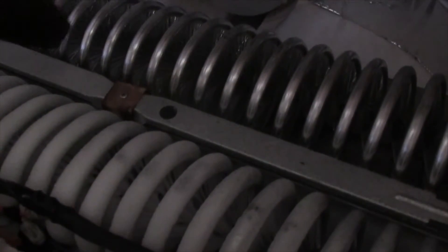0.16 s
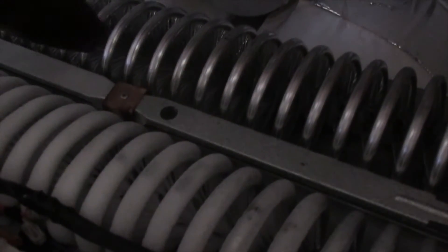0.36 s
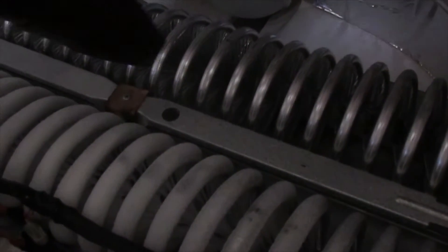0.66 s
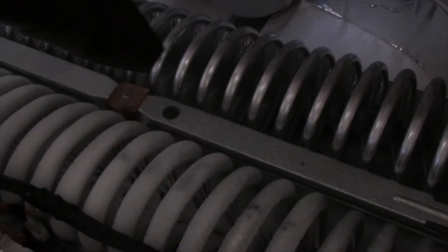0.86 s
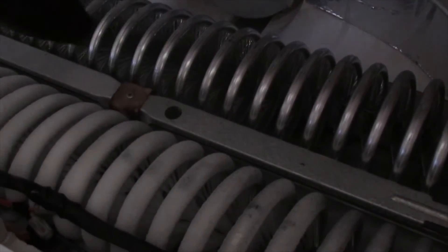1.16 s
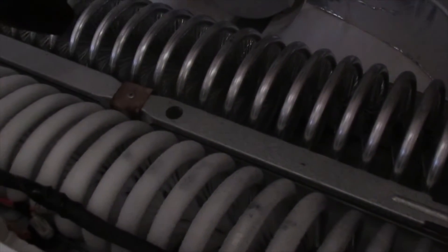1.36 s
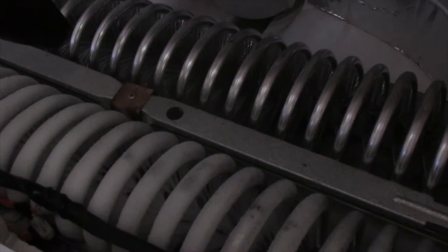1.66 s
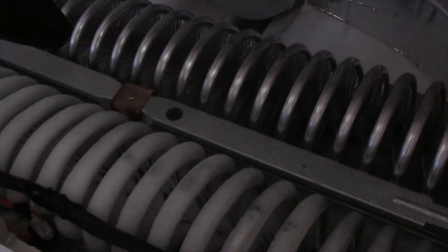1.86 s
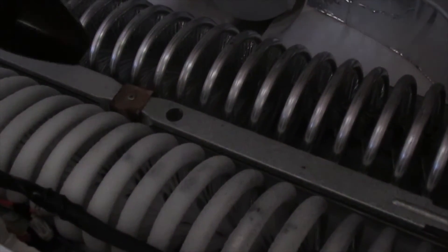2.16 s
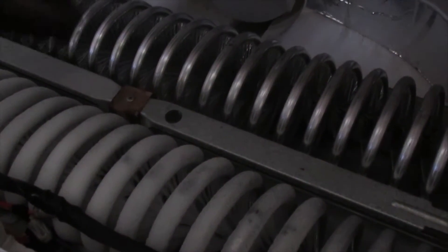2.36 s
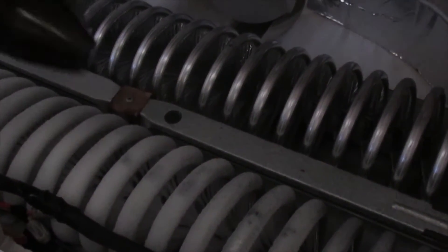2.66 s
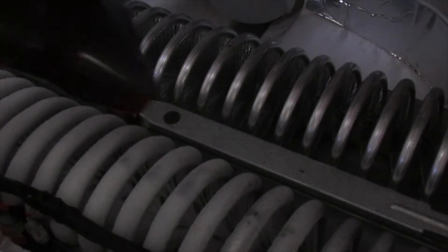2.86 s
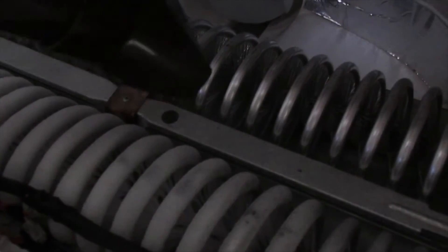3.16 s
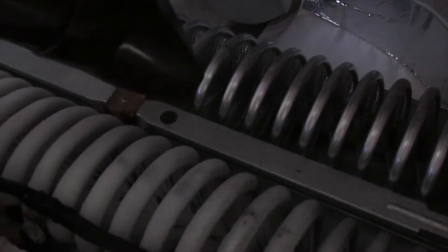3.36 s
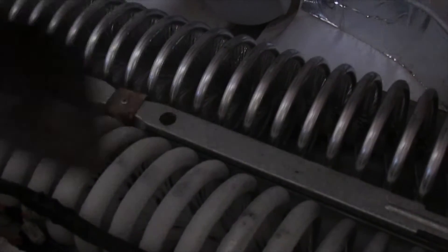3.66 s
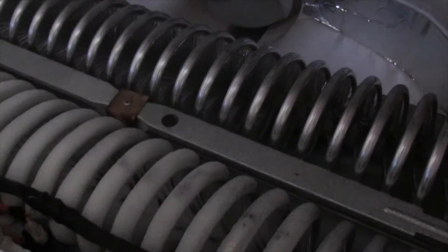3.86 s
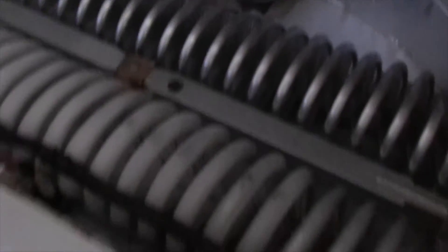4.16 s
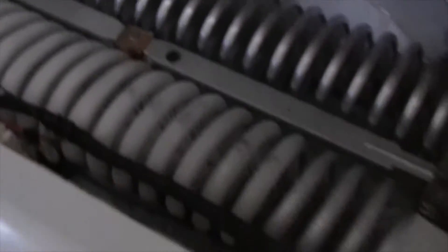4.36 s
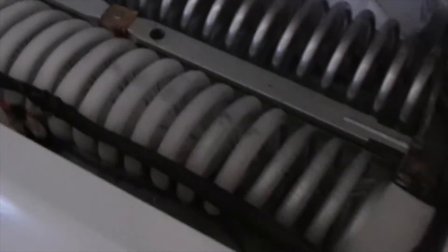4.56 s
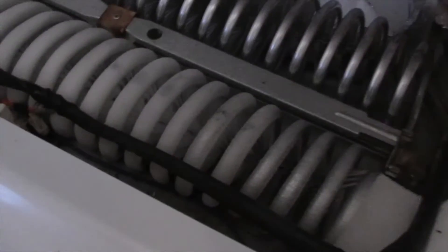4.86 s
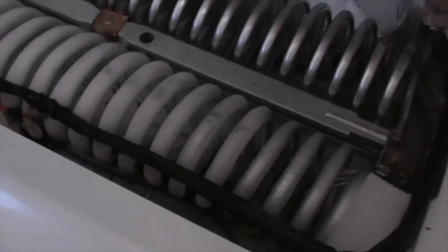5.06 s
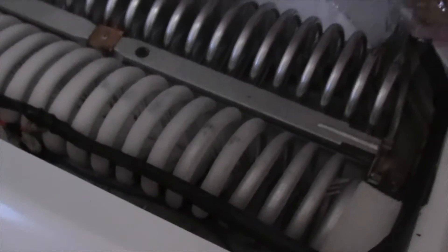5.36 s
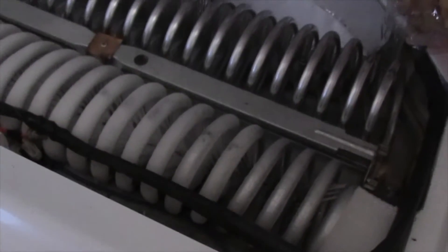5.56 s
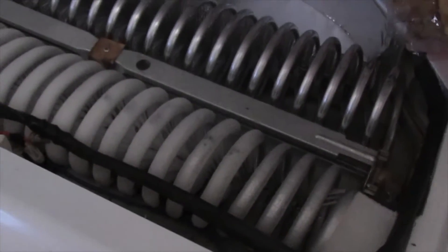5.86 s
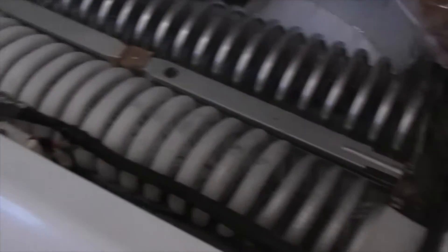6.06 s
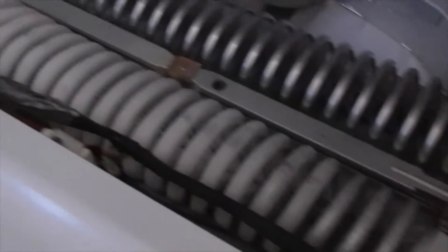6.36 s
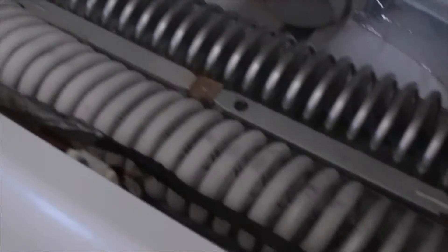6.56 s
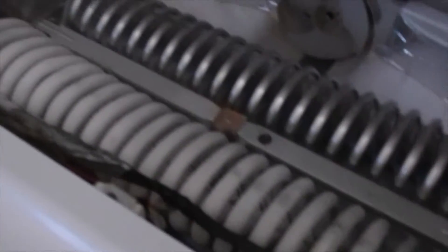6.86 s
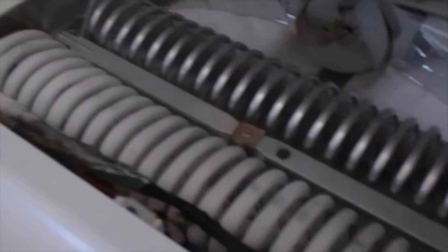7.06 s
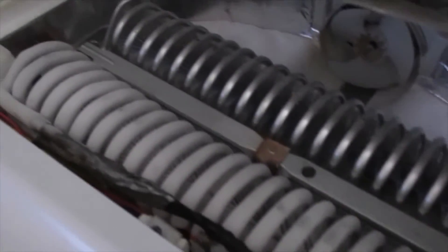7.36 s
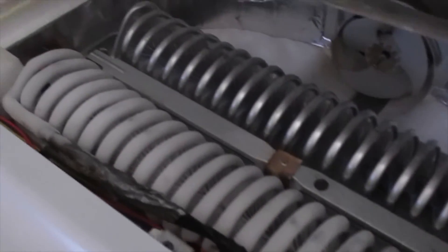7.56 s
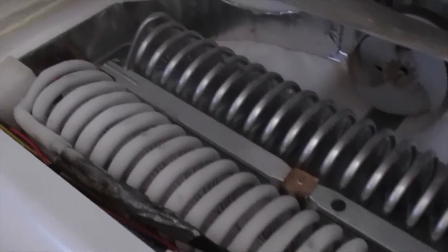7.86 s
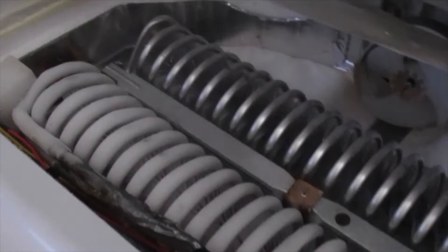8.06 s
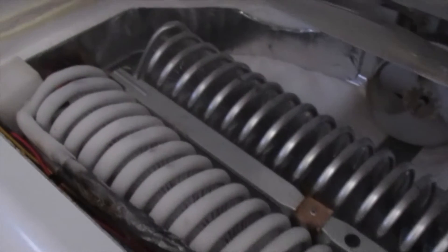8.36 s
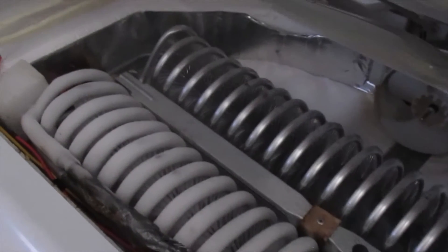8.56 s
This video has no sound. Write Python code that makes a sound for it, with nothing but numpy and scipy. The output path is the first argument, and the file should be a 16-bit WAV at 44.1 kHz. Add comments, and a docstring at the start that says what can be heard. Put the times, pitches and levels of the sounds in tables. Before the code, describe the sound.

A hair dryer blows close to the microphones onto refrigerator coils, a steady fluttering rush with a faint motor whine. A very loud switch snap stops it; the fan whirrs down while hiss creeps back. Rustling and dull thuds follow, then a cluster of hard metallic clanks and scrapes, and finally a few soft knocks in a quiet indoor compartment.

```python
"""Hair dryer in a refrigerator's coil compartment

A dryer blows on the coils near two hissy microphones: turbulence is shaped noise, the motor a set of harmonics.
Its switch snaps off so sharply that a limiter ducks; the fan coasts down whirring while the hiss creeps back.
The dryer is drawn away with a rustle and dull thuds, which are bursts of filtered noise.
Then decaying modes of metal ring under clanks and scrapes, and a few soft knocks follow."""
import sys
import numpy as np
from scipy import signal
from scipy.fft import irfft
from scipy.io import wavfile
from scipy.ndimage import uniform_filter1d

SR = 44100
rng = np.random.default_rng(int(sys.argv[2]) if len(sys.argv) > 2 else 0)


def store_pcm(level_fs):
    """Save levels as 16-bit WAV."""
    pcm = np.round(np.clip(level_fs, -1, 1) * 32767).astype(np.int16)
    wavfile.write(sys.argv[1], SR, np.atleast_2d(pcm).T)


N = 384993
TIME = np.arange(N) / SR
OFF_S = 3.1845  # the switch snaps

# Resonances and hollows of the barrel and compartment. Each row: centre in Hz, width in Hz, lift in dB.
HOLLOWS = [(272, 56, 7.5), (297, 29, 2), (332, 24, -3.5), (397, 45, 4), (543, 42, 4), (618, 51, -4),
           (687, 47, 8.5), (758, 50, 8.5), (837, 80, 5.5), (915, 50, -1), (1314, 84, -3), (1415, 42, 6.5),
           (1510, 70, 3), (1656, 55, 6), (1850, 70, 4), (2086, 65, 3), (2172, 45, 8), (2760, 37, 5),
           (3300, 220, 1.5), (4370, 170, 3.5)]
# What the cabinet gives back when it is hit. Each row: frequency in Hz, relative density in dB per Hz.
CABINET = [(40, -27), (115, -6.5), (175, -20), (260, -0.5), (390, 0.5), (520, -5), (640, -1.5), (800, 4),
           (980, -5.5), (1450, -12), (2300, -30), (6000, -55)]
# Hard clanks against the metal. Each row: start in seconds, thud in dB, crunch in dB, ring in dB,
# crunch t60 in seconds, strength of the jangle as a factor, treble tilt in dB per octave.
CLANKS = [(5.621, -20.5, -19.5, -40, 0.24, 0.2, -1), (5.644, -23, -40, -35, 0.1, 0.5, 0),
          (5.676, -25.5, -15.5, -34, 0.23, 1.6, -2.5), (5.723, -31, -9, -37, 0.091, 0.8, 1.5),
          (5.739, -27, -13.5, -42, 0.2, 1.0, -1.5), (6.022, -24.5, -12.5, -37, 0.22, 0.31, 0),
          (6.088, -31, -25, -41.5, 0.17, 0.6, -6), (6.110, -34.5, -36, -46, 0.1, 0.5, 0)]


def gain_of(db):
    """Decibel law: 20 dB is a factor of ten in amplitude."""
    return 10 ** (np.asarray(db) / 20)


def evened(x):
    """Normalisation to unit root mean square."""
    return x / np.sqrt(np.mean(x ** 2) + 1e-20)


def read(points, hz):
    """Spectral interpolation along a logarithmic frequency axis."""
    f, value = np.transpose(points)
    return np.interp(np.log(hz + 1), np.log(f + 1), value)


def lift_db(resonances, hz):
    """Resonance: each lifts a bell of frequencies, to half its dB at the edges of its width."""
    return sum(lift / (1 + (2 * (hz - f) / width) ** 2) for f, width, lift in resonances)


def add(mix, s, sound):
    """Superposition: a stereo sound joins the mix at s seconds."""
    part = mix[:, round(s * SR):][:, :sound.shape[1]]
    part += sound[:, :part.shape[1]]


def drift(t, rate):
    """Random wandering of unit rms: sines up to rate Hz, the slower the stronger."""
    rates = np.geomspace(rate / 20, rate, 24)
    return evened(sum(np.sin(2 * np.pi * (f * t + rng.random())) / np.sqrt(f) for f in rates))


def pair(shape, same):
    """Coherence: complex noise for two microphones, alike to the degree given by same."""
    a, b = rng.standard_normal((2, *shape)) + 1j * rng.standard_normal((2, *shape))
    same = np.clip(same, -1, 1)
    return np.array([a, same * a + np.sqrt(1 - same ** 2) * b])


def sides(points, hz):
    """Interaural level difference: half the balance goes to each side with opposite sign."""
    return gain_of(np.outer([.5, -.5], read(points, hz)))


def ripple(hz, spacing_hz, full_above_hz=3200):
    """Comb-like interference: fine fixed peaks and dips at each microphone, smaller towards the bass."""
    grid = np.arange(0, SR / 2, spacing_hz)
    heights = rng.standard_normal((2, len(grid)))
    peaks = evened(np.array([np.interp(hz, grid, ear) for ear in heights]))
    return peaks * np.sqrt(np.minimum(hz / full_above_hz, 1))


def burst(colour_db, t60, rise_s):
    """Transient: a second of noise, coloured by one dB value per Hz, swells and decays exponentially."""
    # Each row: frequency in Hz, left-right likeness from -1 to 1.
    knock_same = [(100, 0.9), (400, 0.95), (800, 0.59), (1500, 0.53), (3500, 0.016), (15000, 0.034)]
    t, hz = np.arange(SR) / SR, np.arange(colour_db.shape[-1])
    spectrum = pair(hz.shape, read(knock_same, hz)) * gain_of(colour_db)
    noise = evened(irfft(spectrum, SR))
    return noise * (1 - np.exp(-t / rise_s)) * gain_of(-60 * t / t60)


def fan_speed(t, coast_s=0.6):
    """Exponential coasting: share of full speed, steady until the power is cut."""
    return np.exp(-np.maximum(t - OFF_S, 0) / coast_s)


def air(level_db=-17.5, gap_lift_db=10, gap_width_hz=115, eddy_db=0.9, buffet_db=0.65, cut_db=1.0,
        roar_fall_db=38, treble_fall_db=25, ripple_db=2.5):
    """Turbulence: noise coloured by the hollows it blows through fades and dulls as the fan slows."""
    # The moving nozzle. Each row: time in seconds, jet hiss in dB (only its change counts),
    # pitch in Hz of the hollow between nozzle and coils.
    nozzle = [(0.0, -28.5, 1106), (0.82, -27, 1093), (1.17, -28.5, 1120), (2.26, -27, 1125),
              (2.62, -29, 1090), (2.94, -26, 1013), (3.15, -28, 955)]
    # How far each pitch follows the jet's hiss. Each row: frequency in Hz, share in dB per dB.
    jet_share = [(1200, 0), (2600, 1.0)]
    # Rushing air. Each row: frequency in Hz, relative density in dB per Hz.
    air_colour = [(20, -21), (45, -38), (80, -8.5), (200, -6), (480, -7), (900, -4), (1300, -7),
                  (2400, -13.5), (4800, -16.5), (6600, -13.5), (8500, -18), (10200, -24.5), (13000, -21),
                  (16000, -25.5)]
    # Each row: frequency in Hz, left-right likeness from -1 to 1.
    air_same = [(25, .3), (60, 0.83), (130, 0.98), (300, 0.97), (700, 0.68), (1400, 1), (3000, 0.046),
                (15000, 0.54)]
    # Each row: frequency in Hz, left minus right in dB.
    air_side = [(60, -2), (110, -1.5), (200, 1.5), (380, -4), (700, 4.5), (1290, -2), (2380, 0.5),
                (4400, 2), (8120, 4.5), (15000, 0.5)]
    # Each row: frequency in Hz, phase by which left leads in radians.
    air_lead = [(0, -2.5), (520, 0.5), (950, -0.63), (1890, 2.0), (2150, 1.1), (2500, 3.5), (2840, -2.5),
                (3700, 2.0), (3960, 3.5), (5000, 2), (7150, 8.5), (9040, 12), (13500, 15.5), (16300, 8)]

    t, hz = np.arange(N // 512 + 5) * 512 / SR, np.fft.rfftfreq(2048, 1 / SR)
    nozzle_s, hiss_db, hollow_hz = np.transpose(nozzle)
    jet_db = np.interp(t, nozzle_s, hiss_db)[:, None]
    gap_hz = np.interp(t, nozzle_s, hollow_hz)[:, None]
    field = read(air_colour, hz) + lift_db(HOLLOWS, hz)
    field = field + lift_db([(gap_hz, gap_width_hz, gap_lift_db)], hz)
    # the hand moves the nozzle
    field += (jet_db - hiss_db.mean()) * read(jet_share, hz)
    # eddies come and go in patches of time and frequency
    patches = uniform_filter1d(rng.standard_normal(field.shape), size=8, axis=0)
    field += eddy_db * evened(uniform_filter1d(patches, size=8, axis=1))
    # the jet buffets the coils, so everything above 700 Hz flutters together
    field += buffet_db * drift(t, 29.76)[:, None] * read([(500, 0), (700, 1.0)], hz)
    # the roar drops when the power is cut; slower air makes larger eddies, so the highs die first
    field -= cut_db * (t > OFF_S)[:, None]
    fall_db = roar_fall_db + treble_fall_db * np.log10(np.clip(hz, 150, 6000) / 800)  # per tenfold slowing
    field += np.log10(fan_speed(t))[:, None] * fall_db
    # each microphone has its own balance, reflections and phase
    lead = np.exp(1j * np.outer([.5, -.5], read(air_lead, hz)))
    ears = sides(air_side, hz) * gain_of(ripple_db * ripple(hz, 45)) * lead
    z = pair(field.shape, read(air_same, hz)) * gain_of(field) * ears[:, None]
    x = signal.istft(z.swapaxes(1, 2), nperseg=2048, noverlap=1536)[1][:, :N]
    return gain_of(level_db) * x / x[:, TIME < OFF_S].std()


def motor(shaft_hz=117.8, level_db=3, wobble=0.00093, coast_jitter=0.05, coast_jitter_hz=90, shimmer_db=4.0,
          fade_power=0.94, housing_hz=245, housing_width_hz=130, housing_db=8):
    """Harmonics of rotation: brush whine stops with the current, fan tones glide down through resonances."""
    # Each row: multiple of the shaft rate, relative level in dB.
    whine = [(2, -60), (4, -48), (12, -50), (14, -50), (37, -57), (46, -51), (49, -53), (55, -49),
             (56, -53), (57, -51), (58, -51), (59, -51), (60, -54), (68, -53), (70, -52)]
    t = TIME[::200]
    speed = fan_speed(t)
    # the glide grows uneven as the fan slows
    unsteady = wobble * drift(t, 12) + coast_jitter * (1 - speed) * drift(t, coast_jitter_hz)
    turns = np.cumsum(np.interp(TIME, t, shaft_hz * speed * (1 + unsteady))) / SR
    out = np.zeros((2, N))
    # the fan tones whirr as they pass the housing's resonance
    body = HOLLOWS + [(housing_hz, housing_width_hz, housing_db)]
    for order, db in whine:
        is_brush = order > 20
        drive = t < OFF_S if is_brush else speed ** fade_power
        resonance_db = lift_db(body, order * shaft_hz * speed)
        for ear in out:
            level = drive * gain_of(db + resonance_db + shimmer_db * drift(t, 10))
            lag = rng.random() / 20  # a small share of a turn: mainly high orders differ between the microphones
            ear += np.interp(TIME, t, level) * np.sin(2 * np.pi * order * (turns + lag))
    return gain_of(level_db) * out


def noise_floor(level_db=-32, hum_hz=65, hum_waver_db=2.0, ripple_db=2.5, rumble_below_hz=480,
                rumble_waver_db=2.0):
    """Stationary noise: microphone hiss, with room rumble that comes and goes and a wavering low hum."""
    # Quiet room and microphone hiss. Each row: frequency in Hz, relative density in dB per Hz.
    floor_colour = [(20, -3.5), (85, 1), (160, -5), (300, -5), (450, -7.5), (560, -12), (850, -11),
                    (1350, -10.5), (1900, -9.5), (2250, -8.5), (3000, -3.5), (4000, -3.5), (5800, 1),
                    (10000, -4.5), (13000, -3), (15800, -9)]
    # Resonances that colour the quiet room. Each row: centre in Hz, width in Hz, lift in dB.
    room = [(215, 78, 3.5), (342, 13, 5.5), (430, 38, 7.5), (970, 54, 3), (1336, 75, 4), (3160, 200, 4.5)]
    # Each row: frequency in Hz, left-right likeness from -1 to 1.
    floor_same = [(60, 0.46), (130, 0.024), (290, 0.72), (640, 0.66), (1410, 0.63), (3100, -0.0087),
                  (6820, 0.027), (15000, -0.01)]
    # Each row: frequency in Hz, left minus right in dB.
    floor_side = [(60, -1), (180, 3), (550, -1.5), (1650, 1), (4970, 0), (15000, 4)]
    # The low hum. Each row: time in seconds, level in dB.
    hum = [(5.1, -69), (5.5, -52), (6.3, -54), (6.6, -51), (7.3, -50), (7.8, -58), (8.5, -55)]

    hz, t = np.fft.rfftfreq(N, 1 / SR), TIME[::200]
    colour_db = read(floor_colour, hz) + lift_db(room, hz) + ripple_db * ripple(hz, 60)
    colour = gain_of(colour_db) * sides(floor_side, hz)
    noise = evened(irfft(pair(hz.shape, read(floor_same, hz)) * colour, N))
    low_pass = signal.butter(2, rumble_below_hz, fs=SR, output="sos")
    rumble = signal.sosfiltfilt(low_pass, noise)
    noise += rumble * (np.interp(TIME, t, gain_of(rumble_waver_db * drift(t, 3.3))) - 1)
    hum_db = np.interp(t, *np.transpose(hum)) + hum_waver_db * drift(t, 5)
    hum_tone = np.interp(TIME, t, gain_of(hum_db)) * np.sin(2 * np.pi * hum_hz * TIME)
    return gain_of(level_db) * noise + hum_tone


def switch(snap_db=15.5, snap_t60=0.027, echo_db=-17, echo_t60=0.21):
    """Impulse and reverberation: a very loud, bright snap and its short echo in the compartment."""
    # Each row: frequency in Hz, relative density in dB per Hz.
    snap_colour = [(40, -13), (300, 1), (2000, -2), (3100, -2), (4000, -6), (6000, 0), (12000, 5.5),
                   (16000, -0.5)]
    out, colour = np.zeros((2, N)), read(snap_colour, np.arange(SR // 2 + 1))
    snap = gain_of(snap_db) * burst(colour, snap_t60, 0.0013)
    echo = gain_of(echo_db) * burst(colour, echo_t60, .003)
    add(out, OFF_S, snap + echo)
    return out


def rustle(same=0.79, rough_db=1.5):
    """Friction noise: soft, uneven handling swells and fades as the dryer is drawn away."""
    # Each row: time in seconds, level in dB.
    swell = [(3.721, -56), (3.9, -33), (4.08, -36), (4.3, -38), (4.55, -47)]
    # Each row: frequency in Hz, relative density in dB per Hz.
    rustle_colour = [(40, -22), (120, -10), (400, 10), (560, 3), (800, 1), (1300, -4), (1700, -1),
                     (2200, -3), (3200, -4), (6000, -1.5), (15000, -12)]
    t, hz, out = np.arange(SR) / SR, np.arange(SR // 2 + 1), np.zeros((2, N))
    s, db = np.transpose(swell)
    noise = evened(irfft(pair(hz.shape, same) * gain_of(read(rustle_colour, hz)), SR))
    level_db = np.interp(s[0] + t, s, db) + rough_db * drift(t, 26.1)
    add(out, s[0], noise * gain_of(level_db))
    return out


def thuds(width_octaves=0.36):
    """Dull impact: each blow favours one pitch of the cabinet and loses the treble above its own limit."""
    # Each row: start in seconds, level in dB, pitch in Hz, lift at that pitch in dB, dull above in Hz,
    # rise in seconds, t60 in seconds.
    blows = [(3.955, -21, 420, 20, 1200, .02, 0.24), (3.975, -23, 216, 31, 620, 0.014, 0.21),
             (4.010, -24.5, 1073, 7, 3000, 0.035, 0.47), (4.028, -24, 114, 23, 320, 0.0074, .2),
             (5.629, -8.5, 830, 22, 2300, 0.0026, 0.068), (5.741, -25, 327, 8, 920, .002, 0.12),
             (5.970, -36, 780, 9, 2200, .006, 0.35), (6.028, -31, 115, 11, 320, .003, 0.43),
             (6.034, -20, 400, 15, 1000, 0.0023, 0.11), (6.490, -30, 437, 20, 600, 0.0074, 0.29),
             (6.752, -37.5, 370, 10, 2200, 0.0055, 0.21), (7.803, -30, 1010, 14, 1100, 0.0048, 0.26),
             (7.931, -27, 1640, 12, 4500, 0.0037, 0.37), (7.936, -35, 187, 21, 400, 0.0096, 0.39),
             (8.025, -34.5, 1300, 17, 1700, .006, 0.3), (8.040, -36, 131, 26, 390, 0.018, 0.44)]
    out, hz = np.zeros((2, N)), np.arange(SR // 2 + 1) + 1
    for s, db, pitch, lift, dull_hz, rise_s, t60 in blows:
        colour = read(CABINET, hz) + lift / (1 + (np.log2(hz / pitch) / width_octaves) ** 2)
        colour -= 20 * np.log10(1 + (hz / dull_hz) ** 6)
        add(out, s, gain_of(db) * burst(colour, t60, rise_s))
    return out


def mode(hz, t, apart_hz=4000):
    """Normal mode: a sine of unit rms, its phase between microphones differing by hz / apart_hz radians."""
    phase = 2 * np.pi * rng.random() + np.array([[.5], [-.5]]) * hz / apart_hz
    return np.sqrt(2) * np.sin(2 * np.pi * hz * t + phase)


def struck(t, t60, rise_s=0.0045):
    """Free decay: envelope of a mode t seconds after a blow."""
    since = np.maximum(t, 0)
    return (1 - np.exp(-since / rise_s)) * gain_of(-60 * since / t60)


def rubbed(t, length, t60, attack_s=0.0072, release_t60=0.14, after_ring_db=-7):
    """Forced, then free vibration: a mode holds under a stroke, drops quickly, then rings out."""
    since = np.maximum(t - length, 0)
    release_db = np.maximum(-60 * since / release_t60, after_ring_db - 60 * since / t60)
    return np.clip(t / attack_s, 0, 1) * gain_of(release_db)


def metal(fall_db_per_octave=400, rough_db=1.8, slips_per_s=110, chatter_db=2.2, chatter_per_s=120):
    """Modal excitation: blows and scrapes all feed the same modes; loose contact breaks up the ringing."""
    # Modes of the metal. Each row: frequency in Hz, relative level in dB when struck,
    # relative level in dB when rubbed, t60 in seconds.
    modes = [(356, -7, -34, 0.53), (794, 8, -9, 0.33), (1732, -4.5, -0.5, 0.43), (1804, -16, -19, 0.33),
             (2104, -15, -26, 0.43), (2873, -22, -9.5, 0.36), (5270, -22, -14, .25), (6067, -18, -20, .3)]
    # Touches and knocks that ring mainly one mode. Each row: start in seconds, level in dB, nearby pitch in Hz.
    pings = [(4.040, -41, 1733), (5.235, -39.5, 1733), (5.632, -17, 800), (6.050, -40, 2105),
             (6.055, -41, 1733), (6.160, -45, 802), (6.188, -41, 2116), (6.502, -33.5, 353),
             (6.768, -41, 355)]
    # Sliding strokes that keep the metal singing. Each row: start in seconds, length in seconds, level in dB.
    scrapes = [(5.617, 0.11, -27.5), (5.748, 0.072, -29)]

    t, out = TIME[::40], np.zeros((2, N))
    for hz, struck_db, rubbed_db, t60 in modes:
        slips = gain_of(rubbed_db + rough_db * drift(t, slips_per_s))
        chatter = evened(gain_of(chatter_db * drift(t, chatter_per_s)))
        feeds = []
        for s, db, near_hz in pings:
            ping_db = db - fall_db_per_octave * abs(np.log2(hz / near_hz))
            feeds.append(gain_of(ping_db) * chatter * struck(t - s, t60))
        for s, _, _, ring_db, *_ in CLANKS:
            feeds.append(gain_of(ring_db + struck_db) * chatter * struck(t - s, t60))
        for s, length, db in scrapes:
            feeds.append(gain_of(db) * slips * rubbed(t - s, length, t60))
        envelope = np.linalg.norm(feeds, axis=0)  # the energies add
        out += np.interp(TIME, t, envelope) * mode(hz, TIME)
    return out


def clanks(thud_t60=0.37, thud_rise_s=0.0031, crunch_rise_s=0.0065, ripple_db=2, grain_db=0.9):
    """Hard impact: the cabinet thuds, and the contact crunches and jangles differently at each spot."""
    # Hard contact. Each row: frequency in Hz, relative density in dB per Hz.
    crunch_colour = [(500, -48), (2400, -9.5), (4000, -3), (6000, -1), (9000, -1.5), (13000, -1),
                     (16000, -7.5)]
    # Resonances of the jangle. Each row: centre in Hz, width in Hz, lift in dB at a strength of 1.
    jangle_peaks = [(4300, 250, 3.4), (5300, 220, 8), (6080, 300, 8.5), (7700, 260, 1.6), (9300, 250, 6.4),
                    (10200, 330, 7), (11800, 350, 5), (13050, 260, 4), (14600, 300, 6)]
    out, hz = np.zeros((2, N)), np.arange(SR // 2 + 1)
    for s, thud_db, crunch_db, _, t60, jangle, tilt_db in CLANKS:
        crunch = read(crunch_colour, hz) + jangle * lift_db(jangle_peaks, hz) + ripple_db * ripple(hz, 70)
        crunch += tilt_db * np.log2(np.maximum(hz / 5000, 1))
        roughness = evened(uniform_filter1d(rng.standard_normal(SR), size=60))
        grains = evened(gain_of(grain_db * roughness))
        add(out, s, gain_of(thud_db) * burst(read(CABINET, hz), thud_t60, thud_rise_s))
        add(out, s, gain_of(crunch_db) * grains * burst(crunch, t60, crunch_rise_s))
    return out


def scene():
    """Superposition of everything that reaches the two microphones."""
    return air() + motor() + noise_floor() + switch() + rustle() + thuds() + metal() + clanks()


def record(dry, limit_db=-9, recovery_db_per_s=6.0, notch_hz=7880, notch_q=45, edge_hz=15850):
    """Dynamic compression and filtering: a limiter ducks at once and recovers slowly, then notch and low-pass."""
    power = uniform_filter1d((dry ** 2).mean(0), size=150)
    power_db = 10 * np.log10(abs(power) + 1e-12)
    # each peak is held, then falls at the recovery rate
    fall = TIME * recovery_db_per_s
    held_db = np.maximum.accumulate(power_db + fall) - fall
    over_db = np.maximum(held_db - limit_db, 0)
    ducked = dry / gain_of(uniform_filter1d(over_db, size=40))
    notched = signal.lfilter(*signal.iirnotch(notch_hz, notch_q, SR), ducked)
    low_pass = signal.firwin(511, edge_hz, window=("kaiser", 9), fs=SR)
    return signal.oaconvolve(np.clip(notched, -1, 1), low_pass[None], "same")


dry = scene()
out = record(dry)
store_pcm(out)
```